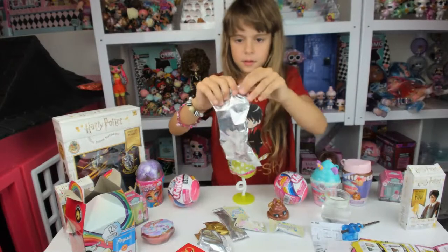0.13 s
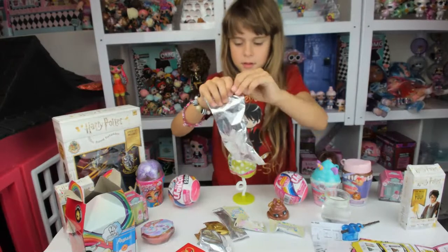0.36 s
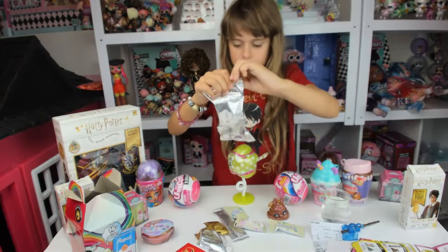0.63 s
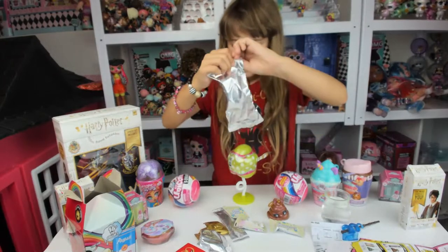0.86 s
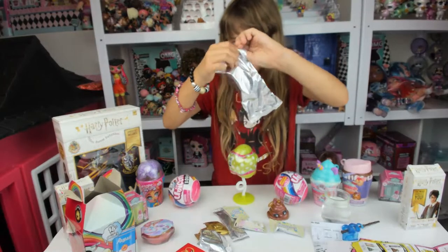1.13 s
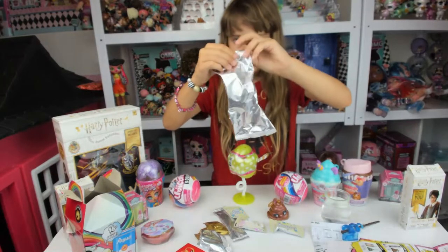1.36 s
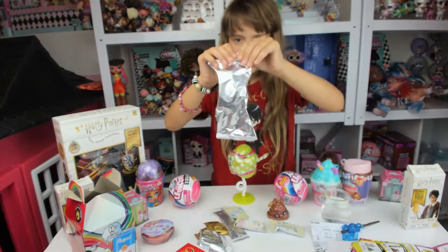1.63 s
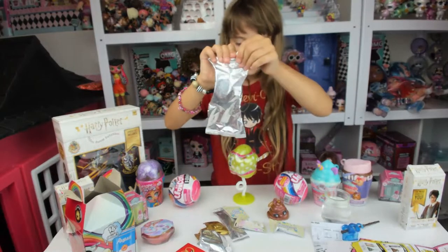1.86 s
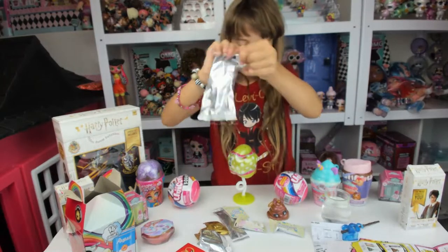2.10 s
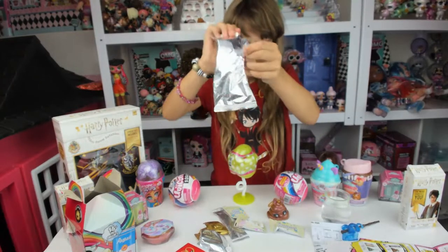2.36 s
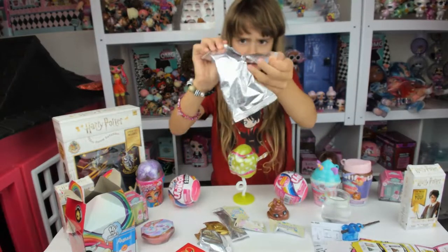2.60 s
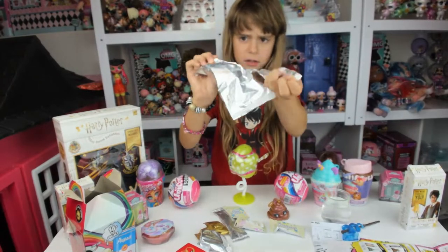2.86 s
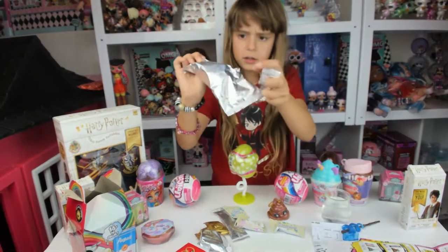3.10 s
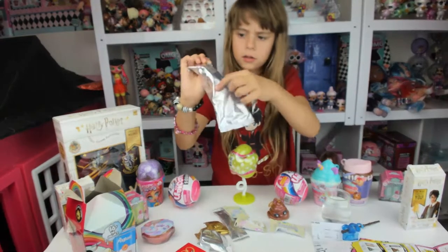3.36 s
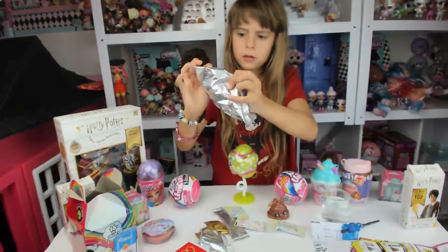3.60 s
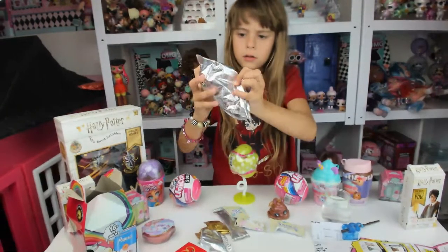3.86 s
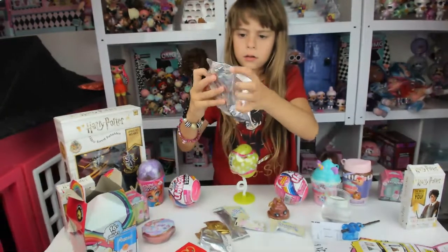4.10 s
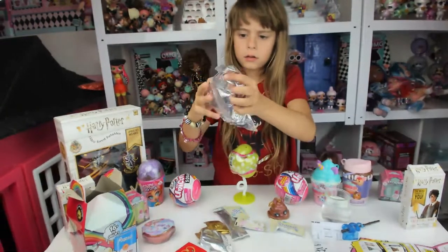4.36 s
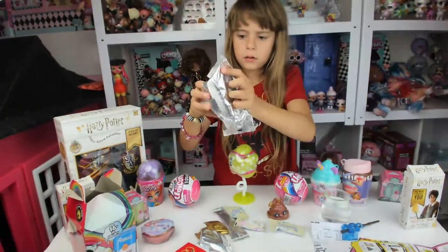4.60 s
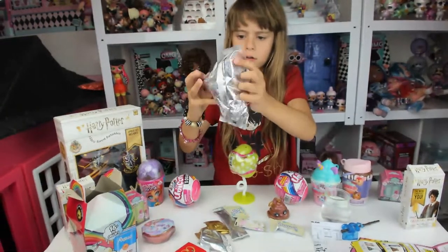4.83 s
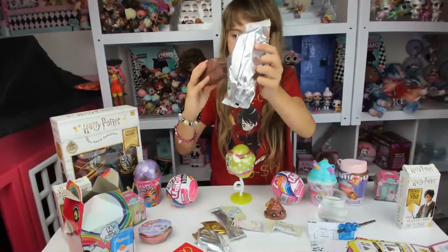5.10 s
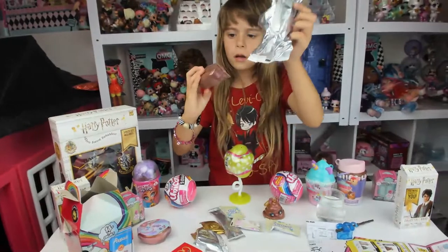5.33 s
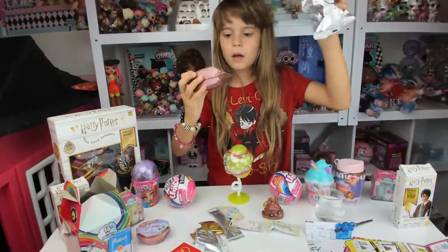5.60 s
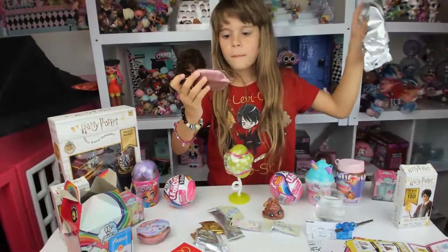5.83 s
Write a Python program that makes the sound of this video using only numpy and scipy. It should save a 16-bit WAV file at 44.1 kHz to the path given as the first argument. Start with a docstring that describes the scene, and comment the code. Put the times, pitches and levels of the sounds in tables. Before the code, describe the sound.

A foil pouch is crinkled by hand at a table, close to the microphone in a small furnished room. Crisp snaps come in loose clusters, thin out around one and a half seconds, then grow brighter and denser with soft thumps as the pouch bends. After five seconds it nearly stops; a faint tap, sparse ticks and a quick double tap on a hollow toy end it.

```python
"""Sharp foil snaps and fine crackle, soft low thumps and, at the end, a few taps on a small hollow toy.
Hands crumple and tear a foil pouch over a table in a small furnished room, a metre or two from a camera.
Each crease rings a stiff panel and an air pocket and spits treble; the bending bag thumps as decaying sines.
The toy is a set of ringing modes. A short noise tail is the room; a suppressor cuts it short.
Under it all lies a very quiet wavering floor of hiss with a low hum."""
import sys
import numpy as np
from scipy import signal
from scipy.fft import rfft, irfft
from scipy.io import wavfile
from scipy.ndimage import uniform_filter1d

SR = 44100
rng = np.random.default_rng(int(sys.argv[2]) if len(sys.argv) > 2 else 0)


def materialize(psi):
    """Save the field psi as 16-bit PCM at rate SR to the path in sys.argv[1].

    A 1-D psi becomes a single channel; in a 2-D psi each row is a channel.
    """
    bounded = np.clip(np.atleast_2d(psi).T, -1, 1)
    quanta = np.round(bounded * 32767).astype(np.int16)
    wavfile.write(sys.argv[1], SR, quanta)


def how_loud(loudness_db):
    """Turn decibels into a plain amplitude multiplier (0 dB gives 1, 20 dB gives 10)."""
    steps = np.asarray(loudness_db, float) / 20
    return 10 ** steps


N = 262924

# Creases snapping through, levels before the mix of their parts: [t/s, panel level/dB, panel f/Hz,
# air pocket level/dB re panel, sharp edge level/dB re panel]
CREASE_SNAPS = [(0.0406, -20.5, 4350, -23.5, -4), (0.052, -11.5, 2230, -20, -7.5),
                (0.0616, -15, 2230, 1, 6), (0.072, -5.5, 4760, -14, -10.5), (0.1075, -18, 3000, -28, -19),
                (0.1198, -22, 4030, -20, -4), (0.208, -17.5, 4160, -11.5, 3.5),
                (0.239, -21, 3140, -29, -10), (0.3814, -10, 2300, -23.5, -0.5),
                (0.4666, -31, 2190, -12.5, 14), (0.4763, -18.5, 2300, -12.5, -4),
                (0.5497, -13, 4340, -29.5, 6.5), (0.581, -16, 2450, -36, -8.5),
                (0.63, -28, 2360, -31, -20.5), (0.694, -8, 2230, -6.5, -7),
                (0.7233, -11.5, 2370, -12, -21.5), (0.729, -5.5, 2390, -12, -7.5),
                (0.7405, -9, 2220, -4.5, -3), (0.785, -17, 2780, -5, -15), (0.8108, -19, 2220, -19, -3.5),
                (0.8184, -13.5, 2380, -12, -15), (0.8378, -11, 1890, -8.5, -1),
                (0.8551, -19.5, 1820, -4.5, -10), (0.8785, -6, 2470, -18, -3.5), (0.909, -20, 2350, -1, 7),
                (0.922, -14, 2410, -2.5, 4.5), (0.9608, -28, 4350, -28, 13),
                (0.9835, -7.5, 2270, -35, -19.5), (1.0254, -10, 2570, -17.5, -11),
                (1.0662, -29.5, 2620, -31, -2.5), (1.0979, -23, 2500, -11, 0),
                (1.1267, -20.5, 2370, -5.5, -28), (1.1371, -8.5, 2330, -10, -8.5),
                (1.145, -12, 3430, -2.5, -1), (1.192, -27.5, 2330, -10, 4.5),
                (1.2127, -13, 2300, -3.5, -2.5), (1.238, -13, 3360, -15, -4), (1.2524, -15, 2800, -13, 0.5),
                (1.311, -15, 2430, -6, 2), (1.3448, -21.5, 2360, -32, -2), (1.3619, -13.5, 4870, -21, 2.5),
                (1.3725, -26, 2510, -30, 4), (1.397, -24, 2580, -17, -2), (1.4995, -31.5, 2740, -35, 7.5),
                (1.5313, -31.5, 2240, -20, -3), (1.5483, -34.5, 2170, -12, -16),
                (1.5677, -33, 2740, -30, -27), (1.603, -23, 2730, -25, -22), (1.6435, -19, 4610, -2.5, -18),
                (1.6551, -13.5, 4410, -12, 4), (1.6963, -8.5, 2380, -18, 7.5),
                (1.7139, -13.5, 2380, -21, -7.5), (1.7194, -20.5, 2300, -23, 8.5),
                (1.7333, -13.5, 2300, -18, 6), (1.7437, -10.5, 2580, -9.5, -5.5),
                (1.762, -20.5, 2800, -30, 10.5), (1.7985, -25.5, 2220, -8, 9.5),
                (1.8074, -7, 2180, -27.5, -10.5), (1.824, -15, 2460, -30, 2), (1.8484, -10.5, 2280, -16, 5),
                (1.9213, -24.5, 2300, -10.5, 12.5), (1.9527, -23.5, 3610, -19.5, -1),
                (2.0129, -16.5, 3410, -28, -0.5), (2.021, -17, 2625, -10.5, 7.5),
                (2.0806, -13.5, 2130, -17.5, 10), (2.0992, -8.5, 1850, -8.5, 1),
                (2.1065, -12.5, 2670, -7, 5), (2.1115, -8.5, 2760, -7, 5),
                (2.118, -10.5, 2820, -10.5, 10.5), (2.1299, -8.5, 3280, -2.5, 6.5),
                (2.145, -10.5, 4890, -4.5, 6), (2.1537, -5.5, 3210, -21, 5), (2.1811, -15, 2095, -13.5, 9),
                (2.1912, -6, 2110, -13.5, 5.5), (2.202, -15.5, 2450, -24.5, 3.5),
                (2.223, -15.5, 2690, -10, 1.5), (2.2295, -13, 2190, -13, -3.5),
                (2.2464, -18.5, 2400, -6, 9), (2.2649, -16.5, 2240, -21.5, -1.5),
                (2.292, -23.5, 3210, -8.5, 2.5), (2.3103, -11.5, 4590, -25, 5),
                (2.3398, -24, 2780, -13.5, 5.5), (2.3623, -13, 2420, -45, 3.5),
                (2.3864, -22.5, 2300, -31, 2.5), (2.394, -19.5, 4610, -30, 9),
                (2.4233, -15.5, 2330, -37, 11), (2.4963, -18.5, 3490, -40.5, -3.5),
                (2.5056, -23, 3210, -31, 8.5), (2.5936, -15.5, 3060, -23.5, -1.5),
                (2.6006, -17, 2440, -3.5, 5.5), (2.611, -8.5, 2890, -12, -1), (2.6356, -20.5, 1940, -10, 2),
                (2.6609, -4, 2580, -3, 4.5), (2.6843, -15, 2690, -9, 6.5), (2.6988, -21, 3290, -13.5, 8),
                (2.7467, -18.5, 2164, -3, 11.5), (2.792, -15.5, 2480, -23, 2.5),
                (2.7981, -10.5, 3380, -11.5, 11), (2.8076, -14, 4740, -13.5, 5),
                (2.8409, -15, 2020, -11, 10), (2.8546, -15, 2050, -21, 5.5), (2.8617, -17, 2110, -5, 2),
                (2.8878, -19.5, 3150, -14, 3), (2.9132, -11.5, 3140, -12.5, 4.5),
                (2.9451, -5.5, 2130, -14.5, 0.5), (2.9928, -8.5, 3360, -32.5, 1),
                (3.1003, -22, 3540, -29.5, 12), (3.1115, -18, 3730, -18.5, 9), (3.13, -28, 4750, -21, 7),
                (3.156, -8, 2790, -27.5, 3.5), (3.191, -19, 3980, -18, 17.5), (3.308, -19.5, 3270, -12, 6),
                (3.3288, -21, 3130, -18, -11.5), (3.3376, -11.5, 3400, -22, -5),
                (3.3515, -12.5, 2470, -27, -2.5), (3.3643, -17.5, 2490, -19.5, -2),
                (3.3791, -13, 2155, -25.5, 2), (3.3915, -11, 2480, -24.5, -1), (3.3974, -14, 2850, -28, -5),
                (3.4133, -11, 4190, -27, 3.5), (3.4768, -25.5, 3190, -9.5, 8),
                (3.4926, -8.5, 4800, -13, -3.5), (3.5102, -13.5, 4650, -11, 8),
                (3.5232, -7.5, 4290, -7.5, 7), (3.54, -8.5, 4670, -5, 1.5), (3.5485, -7, 2230, -23, -11.5),
                (3.5576, -5, 2066, -16, 1), (3.5642, -10, 2240, -21, -11.5), (3.595, -7.5, 2410, -29, -4),
                (3.6104, -13.5, 2260, -12, -2.5), (3.6441, -16, 2280, -19.5, 9.5),
                (3.65, -10.5, 2230, -31, -11.5), (3.6662, -11.5, 2080, -17, -5),
                (3.6712, -13, 2134, -19, 5.5), (3.6941, -13.5, 2270, -13, 6),
                (3.7149, -14, 4090, -17.5, 0.5), (3.7281, -13.5, 2130, -14, 1.5),
                (3.7377, -17.5, 2080, -11, 4), (3.752, -24, 4720, -14, 4), (3.759, -9.5, 2080, -18.5, 2),
                (3.7739, -11, 4050, -26, -2), (3.8116, -5.5, 4100, -35.5, 1), (3.8222, -22, 3900, -18, 9.5),
                (3.8387, -9.5, 3990, -10, -12), (3.8458, -17, 2100, -18.5, 6.5),
                (3.8593, -41.5, 4890, -21, 9), (3.882, -14.5, 2240, -16, 2),
                (3.9145, -5.5, 2240, -11.5, -2.5), (3.9237, -22, 2010, -7.5, -9),
                (3.9363, -4, 2200, -9.5, 4.5), (3.952, -16.5, 2150, -29, 5.5), (3.9731, -8, 4630, -10.5, 2),
                (3.987, -25, 3600, -15, 16.5), (3.9974, -32, 2166, -9, 18), (4.0187, -12, 4670, -21.5, 3),
                (4.026, -13.5, 4360, -12, -2), (4.0528, -21, 2110, 0, 11), (4.0632, -13, 2530, -3.5, -1),
                (4.07, -2.5, 2805, -23, -1), (4.0911, -9, 2890, -15.5, -1.5), (4.0986, -11.5, 4440, -21, 1),
                (4.1107, -12.5, 2140, -28.5, -1.5), (4.1252, -19, 2140, -18, 5), (4.14, -11, 2050, -23, 1),
                (4.1498, -6, 2260, -19, 2), (4.1734, -10, 2200, -14.5, 1.5), (4.1867, -4.5, 2170, -9, 2.5),
                (4.2056, -19.5, 2220, -0.5, -1), (4.2193, -10, 3000, -3.5, 3), (4.2334, -3.5, 2155, -13, 0),
                (4.2529, -9, 1970, -6, -15.5), (4.267, -8.5, 2220, -19, 1), (4.2814, -9, 3620, -12.5, 1),
                (4.3247, -12.5, 2620, -9, 8), (4.3473, -17.5, 4720, -7, 3.5),
                (4.3585, -14.5, 4250, -16.5, 7), (4.365, -13.5, 2870, -24, 6),
                (4.3955, -22, 2360, -15.5, 0), (4.4112, -25.5, 2090, -6, 13.5), (4.423, -15.5, 2150, -6, 0),
                (4.4456, -11, 1870, -11.5, 2), (4.4581, -10, 3530, -3, 2), (4.4716, -10.5, 3520, -2, 4.5),
                (4.4878, -14.5, 4420, -23.5, 4), (4.5008, -3.5, 2234, -20, 4.5),
                (4.5278, -10.5, 2130, -15, -4.5), (4.5429, -12.5, 2170, -20, 9),
                (4.5903, -13, 1980, -16, 11), (4.6135, -14, 2260, -3.5, 8.5),
                (4.637, -15.5, 2156, -8.5, 14), (4.653, -11.5, 2200, -7, -3.5),
                (4.7429, -8, 2800, -26.5, 1), (4.7559, -12.5, 2485, -27, -8.5),
                (4.7705, -10.5, 3620, -14.5, 4.5), (4.8074, -15, 2240, -15, 14),
                (4.8298, -10.5, 2160, -25, 3), (4.839, -16, 3690, -22.5, 5.5),
                (4.8536, -7, 2136, -23.5, -6), (4.8615, -12.5, 2200, -5.5, 3.5),
                (4.876, -11.5, 4150, -2.5, 7), (4.8869, -12.5, 2350, -6, 7),
                (4.8964, -5.5, 2150, -11, -2.5), (4.9092, -7, 2210, -9, 2.5), (4.9197, -5.5, 2210, -5, 2.5),
                (4.9264, -15, 2113, -12, 4), (4.9384, -10.5, 2170, -14, -22), (4.9461, -8, 1870, -6, -0.5),
                (4.9529, -8, 2100, -11.5, -1), (5.0142, -22, 2230, -27, -19), (5.1582, -42, 4820, -7, -24),
                (5.1774, -33, 4500, -10, 10.5), (5.2129, -28.5, 2500, -0.5, 10.5),
                (5.4742, -28, 3250, -5, 5), (5.6937, -14, 2980, -23.5, -15.5),
                (5.7045, -17.5, 2570, -9, -22)]
# Squeezes of the hand that keep crackle going: [t/s, length/s, level/dB before the mix,
# air pocket level/dB re level, air pocket f/Hz, sharp edge level/dB re level]
HAND_SQUEEZES = [(0.026, .01, -37, -23, 1400, -21), (0.039, 0.087, -26, -21, 1010, -3),
                 (0.199, 0.02, -26, -17, 1010, 2), (.284, 0.012, -61, 15, 970, -20),
                 (0.364, .015, -49, 14, 1460, -30), (.375, 0.056, -46, -25, 974, 6),
                 (0.451, 0.15, -33, -24.5, 1000, -5), (0.646, 0.019, -47, 9, 1180, -35),
                 (0.683, 0.021, -26, -17, 1180, -3), (0.722, 0.015, -19.5, -10.5, 1195, -11),
                 (0.753, 0.043, -30, -20, 1110, -4), (0.813, 0.054, -24, -7, 650, -6.5),
                 (0.858, 0.23, -31.5, -24, 1260, -11), (1.121, 0.14, -23, -11.5, 1090, -8),
                 (1.253, 0.15, -32.5, -6, 730, 1), (1.498, 0.053, -39, -16, 1150, -12),
                 (1.642, 0.2, -22.5, -11.5, 737, -4), (1.807, 0.055, -29, -44.5, 800, 1.5),
                 (1.913, 0.055, -41, -9.5, 484, 8.5), (2.023, 0.029, -25.5, -0.5, 930, -3),
                 (2.089, 0.14, -12, -13, 775, -0.5), (2.213, 0.072, -16.5, -16.5, 970, 2),
                 (2.308, 0.17, -38, -17, 1110, 5.5), (2.492, 0.11, -31, -15, 785, -3.5),
                 (2.587, 0.032, -26, -13.5, 930, -6.5), (2.647, 0.047, -32.5, -8, 915, -6),
                 (2.776, 0.098, -18.5, -16.5, 820, -3), (2.90, 0.049, -17.5, -7.5, 563, 0),
                 (2.979, 0.055, -25.5, -16, 446, -1.5), (3.081, 0.018, -40.5, -13, 910, 5),
                 (3.163, 0.067, -38.5, -11, 1310, 0.5), (3.302, 0.11, -28, -5.5, 940, -8),
                 (3.487, 0.12, -13, -25.5, 1110, -8), (3.657, 0.087, -28.5, -7, 966, -54),
                 (3.807, 0.013, -24.5, -22.5, 1170, 4.5), (3.894, 0.12, -17.5, -10.5, 840, -4),
                 (4.025, 0.29, -17, -13, 900, -8), (4.361, 0.33, -18.5, -8.5, 740, -4),
                 (4.732, 0.064, -18.5, -15, 665, -8), (4.796, 0.19, -18.5, -10, 945, -7),
                 (4.997, .02, -41.5, -5, 800, -20), (5.179, 0.02, -34, -7, 735, 2),
                 (5.411, 0.018, -65, 15, 538, -15), (5.473, 0.023, -30, -7, 1400, -14),
                 (5.64, .04, -52, -3, 1296, -12), (5.697, 0.033, -27.5, -5, 1400, -32),
                 (5.717, 0.019, -36.5, 1, 1440, -25)]
# The whole pouch bends and pumps air: [t/s, envelope peak level/dB, f/Hz]
POUCH_FLEXES = [(0.066, -42.5, 456), (0.689, -42, 433), (0.815, -34.5, 434), (1.274, -36.5, 415),
                (1.29, -41.5, 270), (1.647, -41, 424), (1.698, -39, 430), (1.917, -43, 350),
                (2.04, -43.5, 423), (2.1, -38.5, 415), (2.548, -45, 296), (2.656, -35.5, 436),
                (2.791, -39.5, 297), (2.903, -30, 249), (3.004, -38, 300), (3.493, -37.5, 300),
                (3.693, -38.5, 436), (3.749, -39, 456), (3.915, -26.5, 409), (4.016, -33, 436),
                (4.064, -33.5, 398), (4.177, -28, 431), (4.269, -34, 445), (4.358, -28.5, 405),
                (4.454, -25.5, 397), (4.609, -28, 420), (4.648, -42.5, 112), (4.79, -38, 292),
                (4.869, -30.5, 250), (4.908, -25.5, 404), (5.207, -47.5, 458)]
# Taps on the toy, before the mix: [t/s, level/dB, edge level/dB re level, lift of upper rings/dB per octave]
TOY_TAPS = [(5.0863, -26, -50, 9), (5.9454, -14, -26, -4), (5.9524, -13.5, -30, 0.5)]
# Ringing modes of the toy's shell: [f/Hz, relative level/dB, t60/s]
TOY_MODES = [(400, -20.5, 0.044), (1090, -15.5, 0.08), (1320, -1, 0.062), (1440, 3, 0.067), (1560, -4, .05),
             (2280, -10, 0.043), (2480, -11, .04), (2700, -11, 0.063), (3440, -14, .04), (5700, -13, 0.038)]
# Spectral shapes of the noise in a snap, only relative levels count: [f/Hz, level/dB]
POCKET_COLOUR = [(30, -52.5), (120, -50), (250, -7), (420, -3), (630, -5), (1000, 8), (1400, 5),
                 (2500, -24.5)]
PANEL_COLOUR = [(700, -40), (1400, -16), (2150, 1), (2800, -4.5), (3700, -8), (4800, -6.5), (7000, -22.5)]
EDGE_COLOUR = [(2500, -45), (4500, -9.5), (6200, 2.5), (7800, -4), (9300, -2.5), (11500, -8),
               (15500, -47.5)]
FIZZ_COLOUR = [(6000, -27.5), (10000, -5), (13000, 7.5), (16000, -12)]
# Decay of the room in four bands, low to high: [nominal f/Hz, t60/s]
ROOM_DECAY = [(300, 0.22), (1500, 0.12), (5000, 0.1), (14000, 0.06)]
# Spectral shape of hiss and hum, only relative levels count: [f/Hz, level/dB]
FLOOR_COLOUR = [(35, -67.5), (60, -37.5), (142, -25), (180, -8.5), (238, -12.5), (417, -31.5), (882, -26.5),
                (1010, -21.5), (2250, -27), (16000, -47)]

# Crackle rises as the hand closes, sags while it holds, dies as it opens
GRIP_DB_PER_S, SAG_DB_PER_S, LET_GO_DB_PER_S = 2501.5, 23.5, 708
AGE_S = np.arange(-130, 400) / SR  # time around the peak of a snap


def snaps():
    """Loud single creases; the grip of the moment sets the size of the air pocket behind them."""
    s, db, panel_hz, pocket_db, edge_db = np.transpose(CREASE_SNAPS)
    _, _, squeeze_hz, _ = grip(s)
    stray = rng.standard_normal(len(s)).clip(-2, 2)
    pocket_hz = squeeze_hz * np.exp(0.29 * stray)  # each pocket strays from that of its squeeze
    return foil(s, db, panel_hz, pocket_db, pocket_hz, edge_db)


def crackle():
    """Many small creases at random moments, flickering in level and pitch; a few are larger and most tiny."""
    count, flicker_s = 5000, 0.012
    scatter_db, colour_db, flicker_db = 2.0, 5.0, 3.5
    s = rng.uniform(0, N / SR, count)
    db, pocket_db, pocket_hz, edge_db = grip(s)
    # crackle flickers: creases within the same 12 ms share a random level and pitch
    slot = (s / flicker_s).astype(int) % 2000
    shared = rng.standard_normal((3, 2000)).clip(-2, 2)[:, slot]
    pitch, tint = rng.standard_normal((2, 2, count)).clip(-2, 2)
    size = rng.exponential(size=count).clip(0, 3)
    db = db + flicker_db * shared[0] + scatter_db * size - 12
    panel_hz = 2500 * np.exp(0.15 * pitch[0] + 0.21 * shared[1])
    pocket_hz = pocket_hz * np.exp(0.2 * pitch[1] + 0.3 * shared[2])
    pocket_db = pocket_db + colour_db * tint[0]
    edge_db = edge_db + colour_db * tint[1]
    return foil(s, db, panel_hz, pocket_db, pocket_hz, edge_db)


def grip(s):
    """Level and colour of the crackle at times s, set by whichever squeeze is strongest then."""
    start, length, db, *tint = np.transpose(HAND_SQUEEZES)
    age = s[:, None] - start
    closing = GRIP_DB_PER_S * age.clip(None, 0)
    holding = SAG_DB_PER_S * age.clip(0, length)
    opening = LET_GO_DB_PER_S * (age - length).clip(0)
    now_db = db + closing - holding - opening
    return (now_db.max(axis=1), *np.array(tint)[:, now_db.argmax(axis=1)])


def foil(s, db, panel_hz, pocket_db, pocket_hz, edge_db):
    """Each snap rings the panel beside the crease and the air pocket behind it, and spits treble."""
    count = len(s)
    s = np.maximum(s + AGE_S[0], 0)
    panel, pocket, edge = (how_loud(db + re)[:, None] for re in (0, pocket_db, edge_db))
    # the highest treble varies at random from snap to snap
    fizz = edge * how_loud(1.8 * rng.standard_normal((count, 1)).clip(-2, 2))
    # the fold itself rings high
    edge_hz = 7000 * np.exp(0.23 * rng.standard_normal(count).clip(-1.5, 2))
    # a stiff patch rings for a few cycles only
    tones = how_loud(1) * panel * rings(panel_hz, 0.00074, 0.001)
    tones = tones + how_loud(-2) * pocket * rings(pocket_hz, 0.0011, 0.0022)
    tones = tones + how_loud(-13.5) * edge * rings(edge_hz, 0.00049, 0.00048)
    panel_noise = place(s, panel * bursts(count, 0.00042, 0.0032))
    pocket_noise = place(s, pocket * bursts(count, 0.00053, 0.0046))
    edge_noise = place(s, edge * bursts(count, 0.00043, 0.00072))
    fizz_noise = place(s, fizz * bursts(count, 0.00011, 0.000082))
    return (place(s, tones)
            + how_loud(-6.5) * colour(panel_noise, PANEL_COLOUR)
            + how_loud(-8.5) * colour(pocket_noise, POCKET_COLOUR)
            + how_loud(1) * colour(edge_noise, EDGE_COLOUR)
            + how_loud(-7.0) * colour(fizz_noise, FIZZ_COLOUR))


def swell(rise_s, fall_s):
    """Envelope of a snap: a very short exponential rise to the peak, then an exponential fall."""
    return np.exp(np.minimum(AGE_S / rise_s, -AGE_S / fall_s))


def rings(hz, rise_s, fall_s):
    """Brief rings, each begun at its own point of the swing."""
    start = rng.uniform(0, 2 * np.pi, (len(hz), 1))
    return np.sin(2 * np.pi * hz[:, None] * AGE_S + start) * swell(rise_s, fall_s)


def bursts(count, rise_s, fall_s):
    """Short ragged noise bursts, all of one energy."""
    shape = swell(rise_s, fall_s)
    noise = rng.standard_normal((count, len(AGE_S))) * shape
    return noise * np.sqrt(np.sum(shape ** 2) / np.sum(noise ** 2, axis=1, keepdims=True))


def place(times, shapes):
    """Adds each row of shapes into one track at its time."""
    index = (np.asarray(times) * SR).astype(int)[:, None] + np.arange(shapes.shape[1])
    return np.bincount(index.ravel(), shapes.ravel(), N + shapes.shape[1])[:N]


def colour(x, points):
    """Shapes a track by (f/Hz, level/dB) points with a causal minimum-phase response of unit energy."""
    hz, db = np.transpose(points)
    grid = np.maximum(np.fft.rfftfreq(4096, 1 / SR), 1)
    cepstrum = irfft(np.log(how_loud(np.interp(np.log(grid), np.log(hz), db))))
    # folding the cepstrum puts the energy as early as it can be
    cepstrum[1:2048] *= 2
    cepstrum[2049:] = 0
    response = irfft(np.exp(rfft(cepstrum)))[:2048]
    return signal.fftconvolve(x, response / np.sqrt(np.sum(response ** 2)))[:N]


def flexes():
    """Soft low thumps as the pouch wall gives as a whole: sines that rise and fall quickly."""
    s, db, hz = np.transpose(POUCH_FLEXES)
    t = np.arange(SR // 10) / SR
    rise_s, fall_s = 0.004, 0.009
    shape = (1 - np.exp(-t / rise_s)) ** 2 * np.exp(-t / fall_s)
    start = rng.uniform(0, 2 * np.pi, (len(s), 1))
    swings = np.sin(2 * np.pi * hz[:, None] * t + start)
    return place(s, how_loud(db)[:, None] * swings * shape / shape.max())


def toy():
    """Each tap rings the same hollow shell, brighter or duller by where it lands, plus a rattling tick."""
    s, db, edge_db, lift_db = np.transpose(TOY_TAPS)
    hz, mode_db, t60 = np.transpose(TOY_MODES)
    t = np.arange(4000) / SR
    modes = np.sin(2 * np.pi * hz[:, None] * t) * 1000. ** (-t / t60[:, None])
    modes = modes * (1 - np.exp(-t / 0.00054))  # a fingertip pushes softly
    octaves = np.log2(hz / hz[mode_db.argmax()]).clip(0, 1)  # above the strongest mode, one at most
    # only a sharp tap wakes the top rings
    mode_db = mode_db + np.outer(edge_db - edge_db.max(), hz > 3000)
    stray_db = 0.72 * rng.standard_normal((len(s), len(hz)))
    strength = how_loud(db[:, None] + mode_db + lift_db[:, None] * octaves + stray_db)
    tick = place(s + AGE_S[0], bursts(len(s), 0.00051, 0.0018) * how_loud(db + edge_db)[:, None])
    shell = how_loud(-8) * place(s, strength @ modes)
    return shell + colour(tick, EDGE_COLOUR) + how_loud(6) * colour(tick, PANEL_COLOUR)


def room(x):
    """Dense echoes, as bands of decaying noise, that die away quickly, the treble first."""
    t = np.arange(SR // 4) / SR
    edges_hz = [60, 700, 3000, 8000, 19000]
    tail = 0
    for k, (_, t60) in enumerate(ROOM_DECAY):
        band = signal.butter(2, edges_hz[k:k + 2], "bandpass", fs=SR, output="sos")
        noise = signal.sosfilt(band, rng.standard_normal(len(t)))
        tail = tail + noise * np.exp(-np.log(1000) * t / t60)
    tail = tail * (1 - np.exp(-(t / 0.00054) ** 2))
    # the table and shelves close by answer first and louder
    tail = tail * (1 + 2.7 * np.exp(-t / 0.0019))
    return how_loud(-32) * signal.fftconvolve(x, tail)[:N]


def floor():
    """Quiet hiss and hum, shaped from noise, that waver a little in level."""
    hiss = colour(rng.standard_normal(N), FLOOR_COLOUR)
    steps = np.repeat(rng.standard_normal(N // 2000 + 1), 2000)
    waver = uniform_filter1d(steps, 2000)[:N]
    return how_loud(-75.5 + 1.9 * waver) * hiss


def suppress(x):
    """Noise suppressor: whatever sinks under the knee is pushed further down, so tails stop early."""
    knee_db, slope, window_s = -43.5, 0.36, 0.0067
    power = uniform_filter1d(x ** 2, int(window_s * SR))
    level_db = 10 * np.log10(power.clip(1e-12))
    return x * how_loud(slope * (level_db - knee_db).clip(-30, 0))


def scene():
    """Foil and toy over the table, direct and through the room."""
    near = snaps() + crackle() + toy()
    # small things radiate little bass
    near = signal.sosfilt(signal.butter(2, 220, "highpass", fs=SR, output="sos"), near)
    near = near + flexes()
    return (near + room(near))[None]


def top_cut(x):
    """Nothing passes above the cut-off."""
    return signal.sosfilt(signal.butter(12, 16790, fs=SR, output="sos"), x)


def record(dry):
    """The camera rounds the loudest peaks, shortens tails, adds its own floor and trims bass and treble."""
    rounded = 0.92 * np.tanh(dry / 0.92)
    heard = suppress(rounded) + floor()
    heard = signal.sosfilt(signal.butter(2, 70, "highpass", fs=SR, output="sos"), heard)
    trimmed = signal.sosfilt(signal.ellip(8, 0.2, 70, 15900, fs=SR, output="sos"), heard)  # steep low-pass
    return top_cut(trimmed)


dry = scene()
out = record(dry)
materialize(out)
```